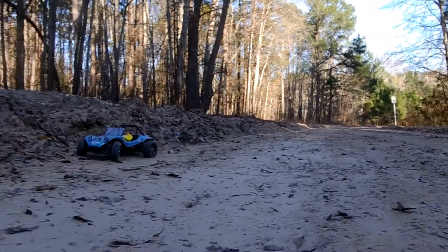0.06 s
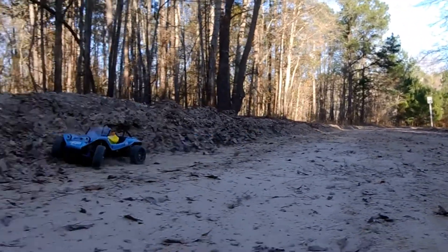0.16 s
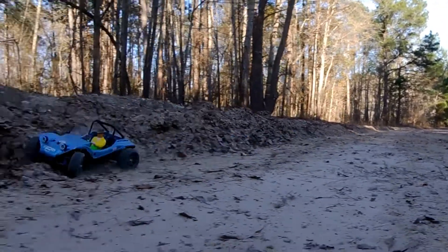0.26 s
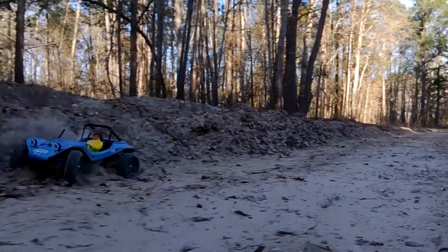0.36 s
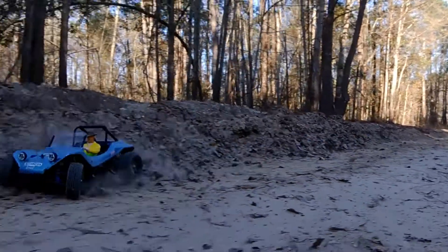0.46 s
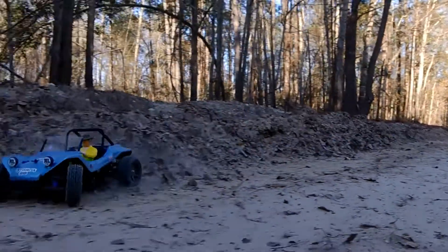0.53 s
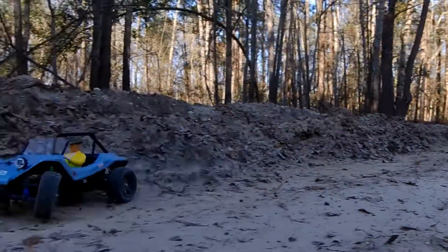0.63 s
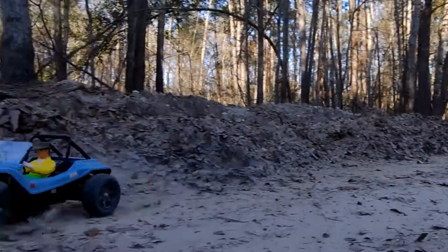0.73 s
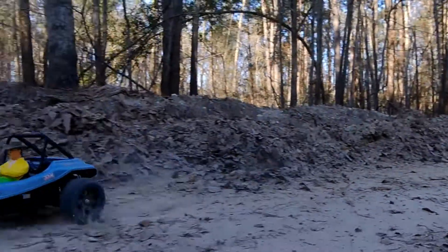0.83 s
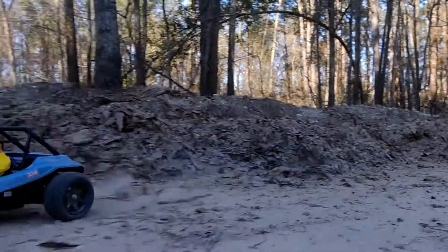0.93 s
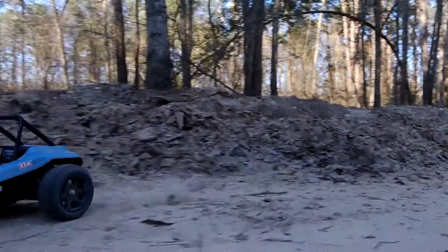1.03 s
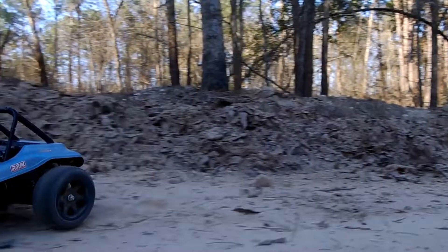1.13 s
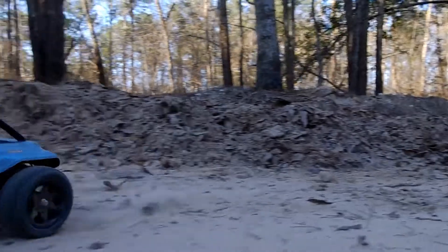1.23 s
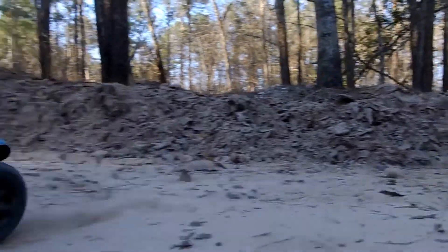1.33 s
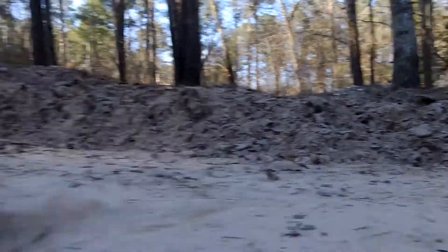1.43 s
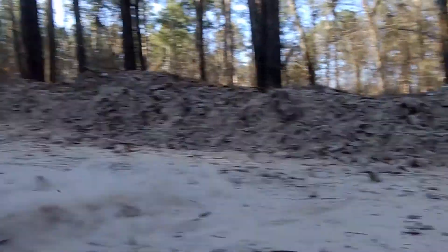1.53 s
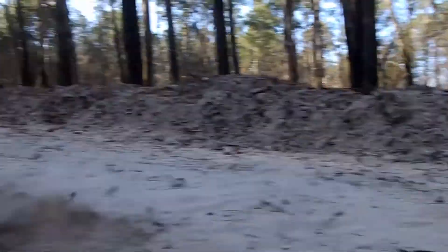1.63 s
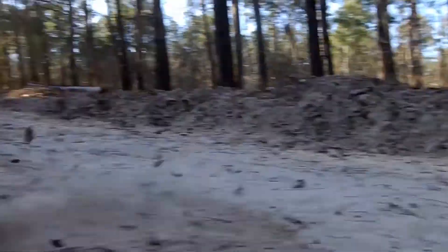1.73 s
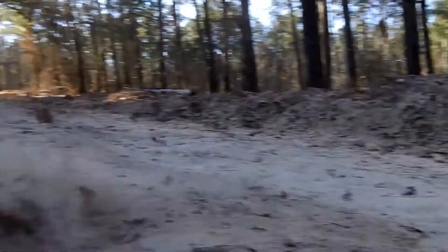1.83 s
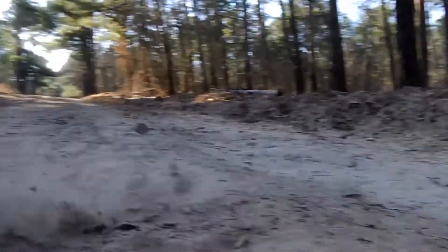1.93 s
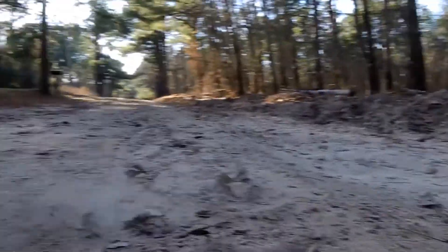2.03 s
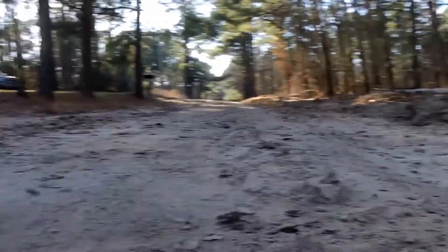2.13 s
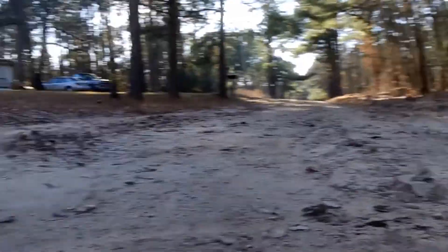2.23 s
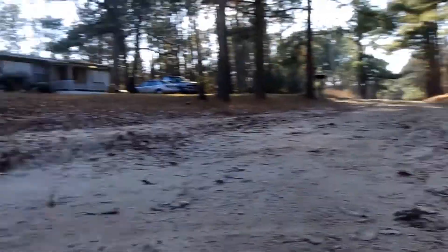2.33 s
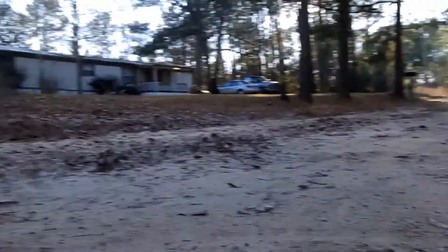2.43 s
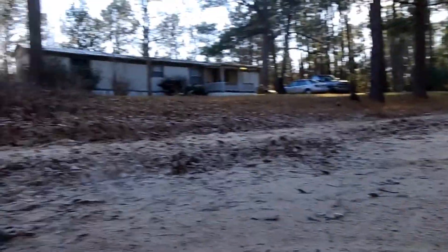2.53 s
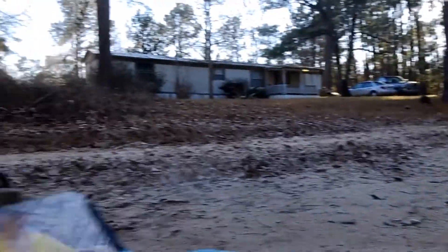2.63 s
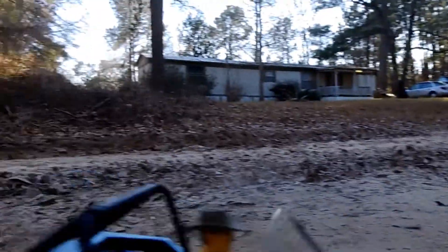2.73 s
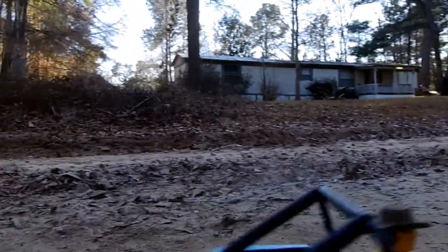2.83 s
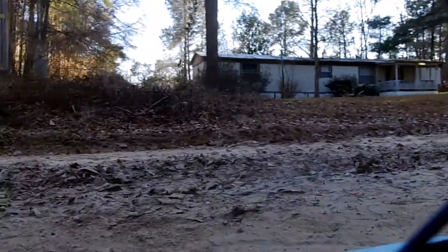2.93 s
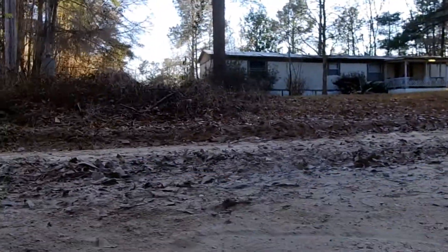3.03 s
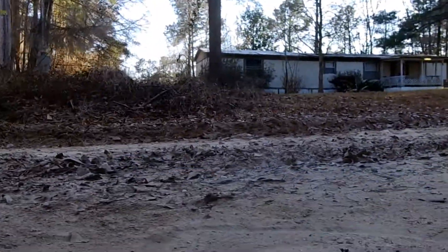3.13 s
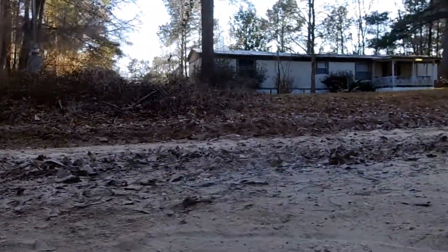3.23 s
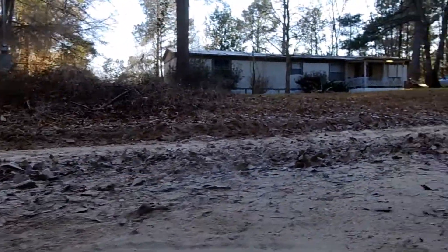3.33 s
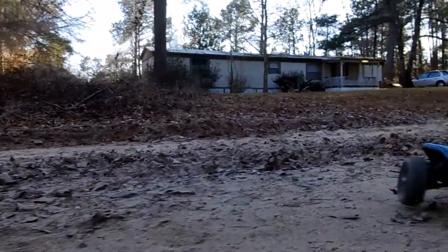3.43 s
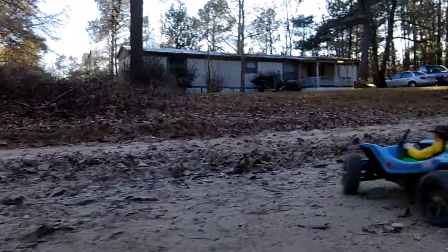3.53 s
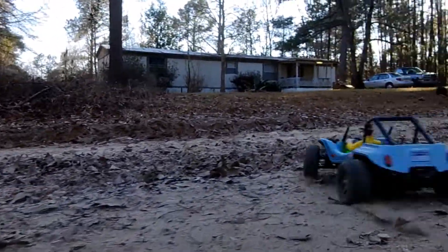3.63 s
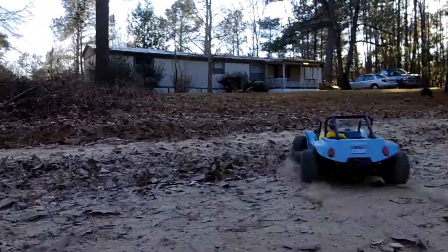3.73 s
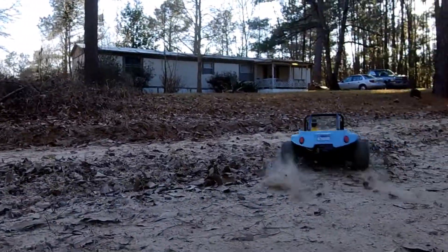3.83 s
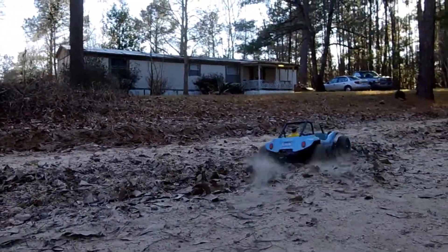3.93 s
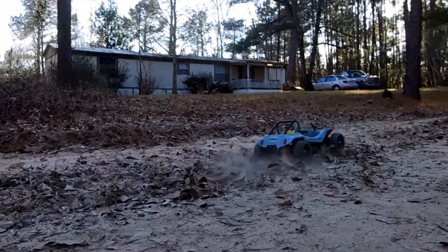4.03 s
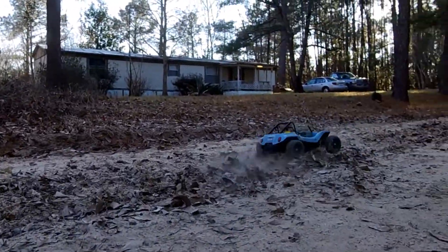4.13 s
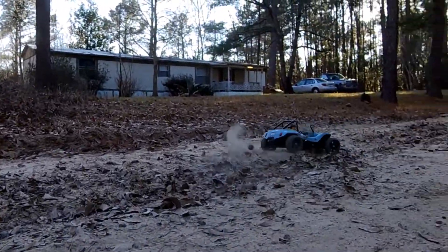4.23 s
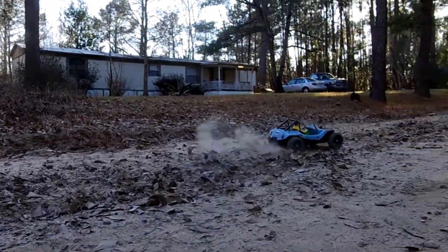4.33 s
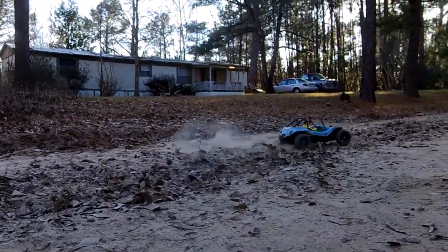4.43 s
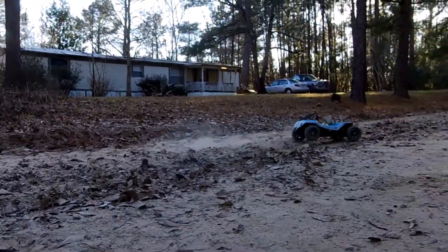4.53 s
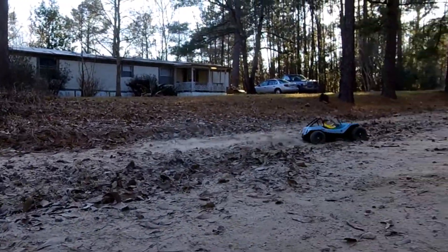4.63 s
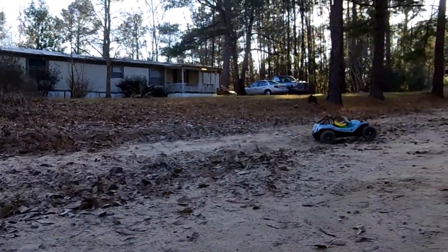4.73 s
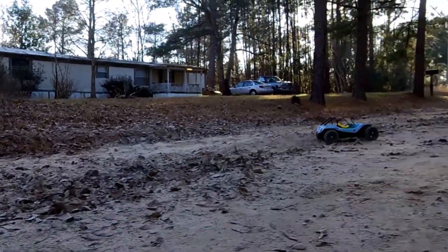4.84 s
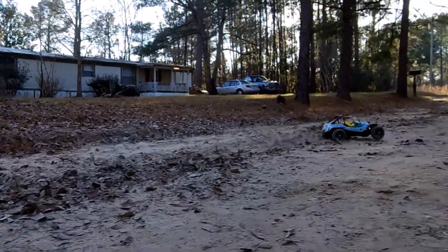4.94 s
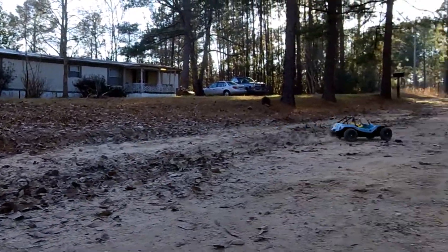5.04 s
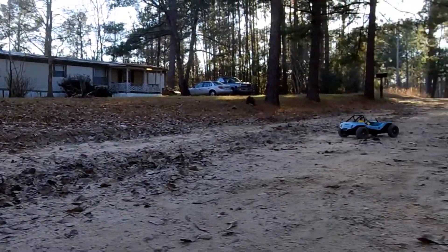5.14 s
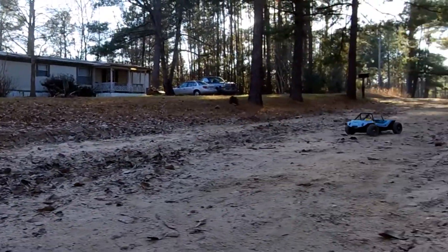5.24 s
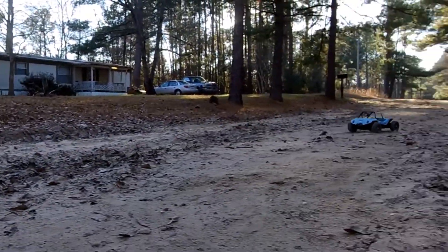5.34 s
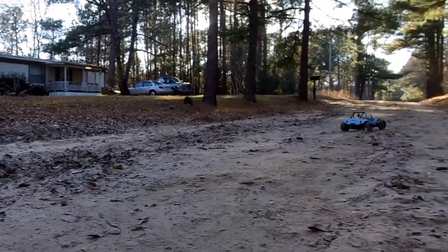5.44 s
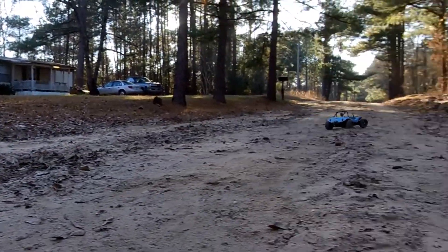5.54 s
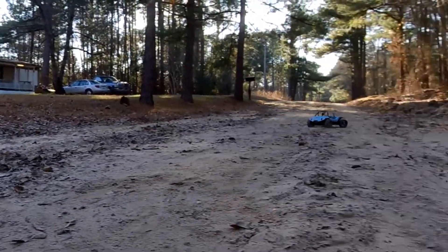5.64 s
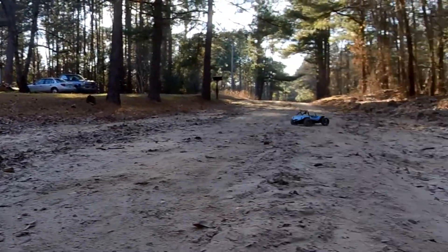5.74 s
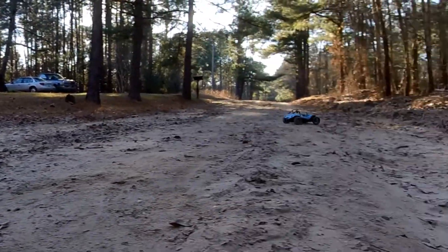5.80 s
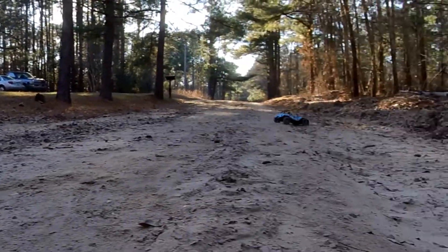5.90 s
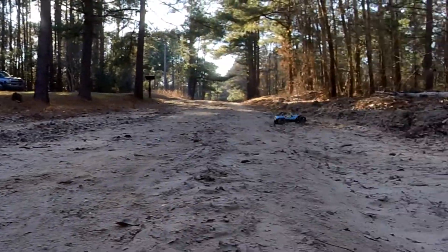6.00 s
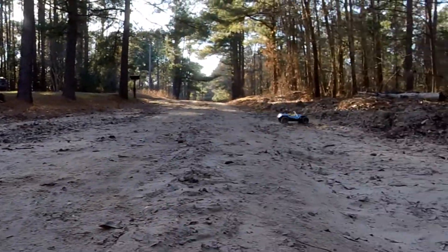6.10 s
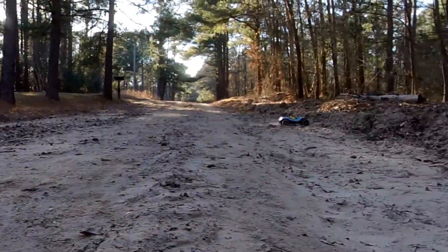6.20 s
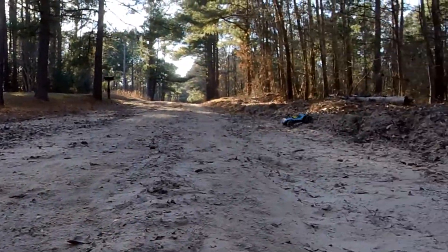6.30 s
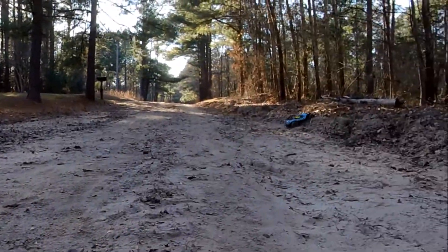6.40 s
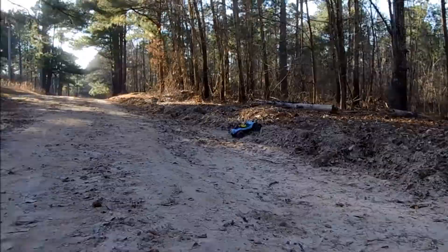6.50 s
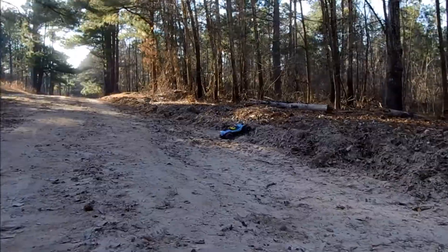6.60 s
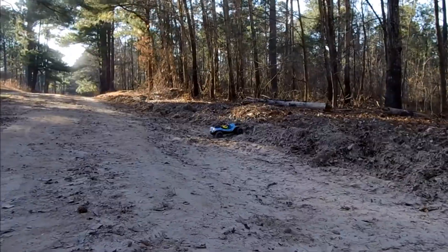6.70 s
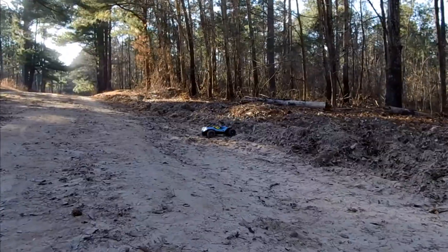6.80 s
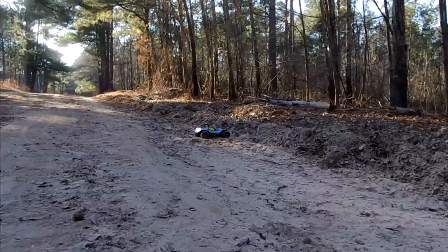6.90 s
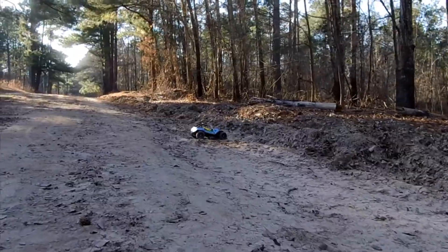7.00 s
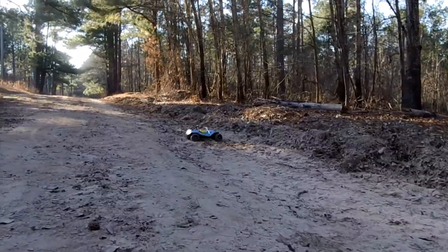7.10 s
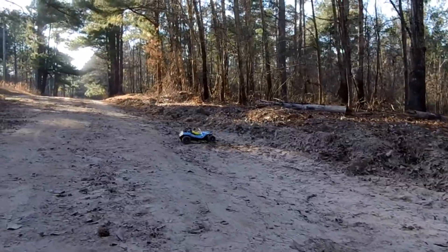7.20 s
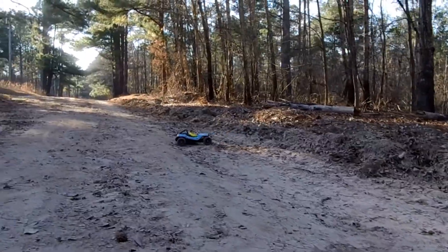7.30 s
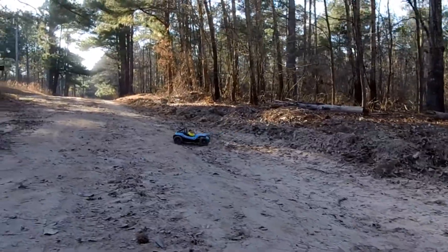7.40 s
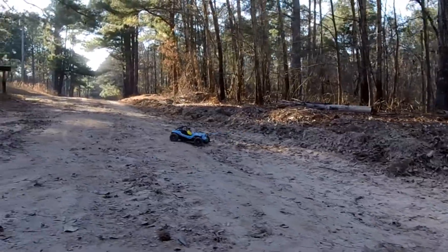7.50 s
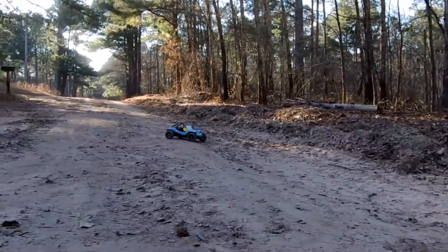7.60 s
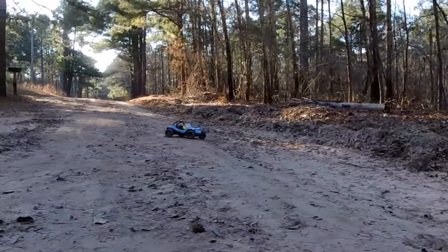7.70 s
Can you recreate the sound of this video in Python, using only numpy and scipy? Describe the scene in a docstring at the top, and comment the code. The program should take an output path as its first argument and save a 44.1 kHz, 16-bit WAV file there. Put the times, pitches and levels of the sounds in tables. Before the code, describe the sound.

Mono, close to the ground on an open dirt road beside woods. From 0 s there is low wind rumble, light plastic rattle and the thin, high whine of a small electric buggy approaching. Around 0.65-0.7 s strong bursts of air buffet the microphone and a loose part clacks; the whine drops and grows rougher as the car passes. More wind thumps come near 1.25-1.5 s, with grit crackling. From about 1.7 to 3.3 s it is loudest: a nasal, rapidly wavering gear whine over hollow chassis clatter, knocks and twig snaps, the rattle peaking near 2.2 s. After 3.5 s it drives away, whine breaking into weaker whirrs and chirps, with small ticks through 6 s. The motor nearly disappears around 6.2-6.7 s, leaving a faint woodland hush and light crackle, then a distant whine returns weakly near 7.2-7.5 s and fades.

```python
"""A low wind rumble and a plastic rattle open the scene, then the gear whine of a small electric buggy on dirt.
The buggy bounces past, turns and drives off. Its whine is tooth-rate harmonics that race and sag; random knocks
ring its chassis, tyre grit is coloured crackle, and wake and breeze are shaped noise buffeting the microphone.
Woods hush far off; twigs snap as short noise bursts, and a loose part clacks as decaying sines."""
import sys
import numpy as np
from scipy import signal
from scipy.fft import rfft, irfft, next_fast_len
from scipy.io import wavfile
from scipy.ndimage import uniform_filter1d

SR = 44100
rng = np.random.default_rng(int(sys.argv[2]) if len(sys.argv) > 2 else 0)


def amplitude_ratio(level_db):
    """Convert a level in decibels to the matching linear amplitude (field) ratio."""
    exponent = np.asarray(level_db, float) / 20
    return 10 ** exponent


def generate_wav(signal):
    """Clip the signal to [-1, 1] and save it as 16-bit WAV at the path in sys.argv[1]."""
    frames = np.transpose(np.atleast_2d(signal))
    scaled = np.clip(frames, -1, 1) * 32767
    pcm = np.round(scaled).astype(np.int16)
    wavfile.write(sys.argv[1], SR, pcm)


N = 342171
T = np.arange(N) / SR

# Chassis resonances: mode_hz, width_hz, relative level_db
CHASSIS_MODES = [(168.06, 110, -11), (364.4, 71, 3.5), (460, 93, 6), (632, 255, 0), (990, 380, -3.5),
                 (1245, 150, -3.5), (1740, 1060, -6), (2400, 1000, -14)]
# Spectrum of thrown grit and leaves: frequency_hz, relative density_db (per Hz)
GRIT_SPECTRUM = [(600, -37), (1500, -22), (3100, -4.5), (5000, 1), (7000, -2), (10000, -3.5), (13000, -7),
                 (16000, -9.5)]
# Resonances of a loose plastic part: mode_hz, relative level_db, t60_s of a single clack
LOOSE_PART_MODES = [(1157, 1.5, 0.052), (2200, -4.5, 0.04)]


def level(x, db):
    """Set the rms level."""
    return x * amplitude_ratio(db) / np.sqrt(np.mean(x ** 2))


def curve(table):
    """Columns of a table joined by straight lines in time."""
    s, *columns = np.transpose(table)
    return [np.interp(T, s, c) for c in columns]


def response_db(table, hz):
    """Read a spectrum on a log-frequency axis."""
    f, db = np.transpose(table)
    return np.interp(np.log(np.maximum(hz, 1)), np.log(f), db)


def colour(x, table):
    """Filter by a spectrum."""
    size = next_fast_len(N)
    hz = np.arange(size // 2 + 1) * SR / size
    return irfft(rfft(x, size) * amplitude_ratio(response_db(table, hz)), size)[:N]


def ring(x, modes):
    """Sum of resonances with alternating sign."""
    out = 0
    for k, (hz, width_hz, db) in enumerate(modes):
        b, a = signal.iirpeak(hz, hz / width_hz, fs=SR)
        out = out + (-1) ** k * amplitude_ratio(db) * signal.lfilter(b, a, x)
    return out


def walk(rate):
    """Random levels held 1 / rate s and slewed twice; spread near 1."""
    k = int(SR / rate)
    held = np.repeat(rng.standard_normal(N // k + 1), k)
    return 1.3 * uniform_filter1d(uniform_filter1d(held, k), k)[:N]


def grains(per_s, spread_db):
    """Random impacts, many small and a few large; a negative spread favours the large ones."""
    chance = rng.random((3, N))
    hits = chance[0] < per_s / SR
    sign = np.sign(chance[1] - .5)
    return hits * sign * amplitude_ratio(-spread_db * np.log(chance[2] + 0.15))


def swell(s, length):
    """A smooth rise and fall around a moment, top 1."""
    return np.exp(-(2 * (T - s) / max(length, .01)) ** 2)


def wind():
    """Gusty rumble that gains a higher flutter as it strengthens, plus single eddies that push and sag back."""
    # steady air over the microphone, raised by the car's wake: time_s, level_db
    steady_air = [(0, -40.5), (.58, -47), (.75, -30), (1.15, -30.5), (1.5, -30.5), (1.8, -48), (3, -46.5),
                  (3.5, -43), (3.85, -50), (6.5, -53.5), (6.8, -46), (7.76, -48.5)]
    # gusts on top: centre_s, level_db, length_s
    gust_swells = [(0.185, -28, 0.039), (0.647, -16.5, 0.027), (0.713, -27.5, 0.026), (1.233, -30.5, 0.17),
                   (1.53, -25, 0.1), (2.187, -47, 0.19), (3.32, -47, 0.087), (5.942, -42, 0.089)]
    # rumble spectrum: frequency_hz, relative density_db (per Hz)
    rumble_spectrum = [(12, -17), (24, 7), (42, 3.5), (75, -2.5), (130, -10.5), (220, -52.5)]
    # eddies hitting the microphone port: centre_s, peak_db before the high-pass, width_s (one sigma)
    eddies = [(1.357, -17, 0.0011), (1.367, -8, 0.00095), (1.383, -12, 0.0033), (1.404, -7.5, 0.00095),
              (0.847, -19.5, 0.0012), (0.876, -21, 0.0023)]
    strong_db = -32  # above this wind level the flutter is lifted, below it is held back
    brighten = .45   # extra flutter, dB per dB of wind

    air = amplitude_ratio(curve(steady_air)[0])
    air = air + sum(amplitude_ratio(db) * swell(s, length) for s, db, length in gust_swells)
    wind_db = 20 * np.log10(air)
    rumble = level(colour(rng.standard_normal(N), rumble_spectrum) * amplitude_ratio(1.5 * walk(22)), -5.0)
    flutter = level(ring(rng.standard_normal(N), [(108, 52, 0)]) * amplitude_ratio(9.3 * walk(30)), -12.5)
    flutter = signal.sosfilt(signal.butter(2, 260, fs=SR, output="sos"), flutter)
    gusts = amplitude_ratio(wind_db) * (rumble + amplitude_ratio(brighten * (wind_db - strong_db)) * flutter)
    push = sum(amplitude_ratio(db) * np.exp(-.5 * ((T - s) / width) ** 2) for s, db, width in eddies)
    b, a = signal.butter(1, 30, "high", fs=SR)  # makes each push sag back
    return gusts + signal.lfilter(b, a, push)


def rolling():
    """Stones knock each chassis mode on its own over a scrub of tyres; grit and leaves crackle in bursts."""
    # the car coming, passing, turning and leaving: time_s, rattle_db, grit_db
    drive = [(0, -47, -55), (.4, -44, -47.5), (.68, -40.5, -51), (.95, -43, -57.5), (1.3, -39.5, -56.5),
             (1.6, -39, -49.5), (1.85, -36.5, -48.5), (2.24, -31.5, -56), (2.46, -35, -72),
             (2.88, -41.5, -49.5), (3.1, -35.5, -49), (3.35, -42.5, -47.5), (3.6, -43, -52.5),
             (3.95, -46.5, -52.5), (4.35, -50, -56), (4.6, -52.5, -62.5), (4.9, -51, -60.5),
             (5.3, -54.5, -67.5), (5.6, -59.5, -63.5), (6.04, -55, -67.5), (6.14, -66.5, -66.5),
             (6.75, -63.5, -64), (7.18, -61.5, -68.5), (7.54, -60, -72), (7.76, -71, -73)]
    # jolts over ruts and leaf piles, added on top: centre_s, rattle_db, grit_db, length_s
    jolts = [(0.452, -46, -63, 0.048), (0.87, -49, -50, 0.026), (1.18, -39, -71, 0.071),
             (1.337, -59, -53, 0.08), (1.589, -47, -42, 0.11), (1.706, -33.5, -48, 0.042),
             (2.852, -40.5, -75, 0.41), (3.336, -39.5, -53, 0.018), (6.419, -74, -61.5, 0.042),
             (7.511, -52, -92.5, 0.057), (7.75, -58.5, -93, 0.067)]

    rattle_db, grit_db = curve(drive)
    rattle_gain = amplitude_ratio(rattle_db) + sum(amplitude_ratio(db) * swell(s, length) for s, db, _, length in jolts)
    grit_gain = amplitude_ratio(grit_db) + sum(amplitude_ratio(db) * swell(s, length) for s, _, db, length in jolts)

    modes = 0
    for mode in CHASSIS_MODES:
        stones = level(grains(per_s=180., spread_db=3.0), -3.5)
        scrub = level(rng.standard_normal(N), -4.5)
        modes = modes + ring((stones + scrub) * amplitude_ratio(3.15 * walk(30)), [mode])
    rattle = level(modes * amplitude_ratio(1.06 * walk(30.01)), 0)

    spray = level(grains(per_s=4400.0, spread_db=15.0), -0.87) + level(rng.standard_normal(N), -1.5)
    grit = level(colour(spray, GRIT_SPECTRUM) * amplitude_ratio(3.25 * walk(35)), 0.077)

    # the loose part chatters along, its modes damped harder than in a single clack
    damped_modes = [(hz, 9 / t60, db) for hz, db, t60 in LOOSE_PART_MODES]
    chatter = level(ring(grains(per_s=45., spread_db=-8.5), damped_modes), -18.0)
    return rattle_gain * (rattle + chatter) + grit_gain * grit


def gears():
    """Tooth-rate harmonics through the gearbox, throbbing once a pinion turn, with a rasp of worn teeth."""
    # gears race as wheels skip, sag as they bite, sing louder under load:
    # time_s, tooth_rate_hz, whine_db before load and lost contact
    mesh = [(0, 2615, -66), (0.08, 2610, -54.5), (0.165, 2470, -62), (0.19, 2637, -51), (0.42, 2080, -62),
            (0.5, 2640, -66), (0.531, 2770, -49), (0.546, 2400, -45), (0.573, 2730, -43),
            (0.588, 2440, -48.5), (0.609, 2630, -51), (0.63, 2144, -46), (0.655, 2646, -47.5),
            (0.671, 2400, -45.5), (0.69, 2283, -51), (0.704, 1890, -35), (0.726, 1934, -43),
            (0.746, 2156, -43), (0.78, 2420, -47), (0.81, 2250, -46.5), (0.85, 2920, -52.5),
            (0.866, 2640, -45.5), (0.912, 1960, -41.5), (0.948, 1847, -43), (0.96, 2086, -38.5),
            (0.976, 1906, -40), (0.988, 2122, -36), (1.002, 1899, -49), (1.018, 2033, -36),
            (1.032, 1872, -43), (1.047, 1918, -43), (1.064, 1840, -35.5), (1.086, 2147, -43),
            (1.101, 2055, -39.5), (1.125, 2114, -39.5), (1.141, 1918, -38.5), (1.161, 2107, -41.5),
            (1.213, 2150, -39), (1.239, 1667, -35.5), (1.283, 2142, -39), (1.317, 2237, -42),
            (1.343, 1866, -34), (1.417, 2414, -45.5), (1.449, 2415, -39), (1.471, 1910, -33.5),
            (1.501, 1670, -39), (1.535, 2140, -40), (1.57, 2088, -34), (1.584, 1720, -37.5),
            (1.596, 1720, -44), (1.612, 2040, -37), (1.65, 2210, -42.5), (1.68, 2200, -57.5),
            (1.7, 2200, -29.5), (1.714, 2150, -36), (1.726, 1852, -38.5), (1.744, 2200, -34.5),
            (1.782, 2210, -33), (1.798, 1856, -33), (1.82, 1804, -29.5), (1.85, 2160, -36.5),
            (1.92, 1933, -33.5), (1.956, 2146, -35.5), (1.974, 1864, -33), (2.039, 2120, -37.5),
            (2.071, 1790, -31.5), (2.127, 2050, -35.5), (2.193, 1762, -37), (2.251, 1942, -33),
            (2.377, 1407, -40.5), (2.426, 1666, -39.5), (2.46, 1530, -42), (2.49, 1736, -36.5),
            (2.534, 1679, -41.5), (2.56, 1806, -31.5), (2.632, 1552, -40), (2.674, 1800, -32.5),
            (2.7, 1690, -35), (2.72, 1905, -36), (2.772, 1706, -38), (2.814, 2024, -31.5),
            (2.842, 1706, -34.5), (2.893, 1874, -29.5), (2.955, 1928, -39.5), (2.991, 1676, -30),
            (3.035, 2152, -44.5), (3.047, 1775, -32), (3.081, 1730, -40), (3.099, 2166, -41),
            (3.127, 2254, -41.5), (3.145, 1766, -33.5), (3.169, 1540, -43), (3.195, 2067, -40),
            (3.221, 2167, -37), (3.265, 1532, -38.5), (3.293, 2090, -53), (3.322, 2330, -37),
            (3.35, 1658, -43.5), (3.394, 2075, -41.5), (3.432, 1604, -45), (3.476, 1640, -45),
            (3.498, 2155, -42.5), (3.544, 1986, -42), (3.562, 1680, -41), (3.578, 1938, -43.5),
            (3.614, 2115, -45), (3.656, 1730, -44.5), (3.676, 1905, -42.5), (3.688, 1740, -45),
            (3.714, 1790, -43.5), (3.753, 2240, -43), (3.769, 1863, -41), (3.801, 1690, -45),
            (3.851, 2250, -48.5), (3.9, 2360, -51), (3.915, 2620, -48.5), (3.955, 1800, -47),
            (3.978, 2216, -52.5), (4.033, 1770, -50.5), (4.057, 1750, -44.5), (4.077, 2115, -51),
            (4.11, 2374, -59), (4.165, 1740, -45), (4.19, 2210, -57), (4.21, 1776, -44.5),
            (4.258, 2324, -50), (4.296, 2300, -56.5), (4.348, 1950, -54.5), (4.362, 1650, -47),
            (4.45, 2080, -58.5), (4.482, 1783, -51.5), (4.496, 1555, -55), (4.52, 1860, -57),
            (4.538, 2070, -47), (4.555, 1827, -54), (4.575, 1794, -81), (4.592, 1835, -51),
            (4.605, 1580, -58), (4.644, 1876, -49), (4.662, 1515, -56), (4.69, 1470, -48),
            (4.705, 1458, -69), (4.716, 1595, -50), (4.731, 1670, -51), (4.743, 2200, -56),
            (4.77, 2410, -51), (4.8, 2047, -58.5), (4.822, 1950, -77), (4.834, 1680, -49),
            (4.862, 2010, -54), (4.888, 1970, -50), (4.908, 1584, -57), (4.924, 2010, -60),
            (4.942, 1986, -44), (4.96, 2376, -56.5), (4.976, 2330, -62), (5.008, 1697, -47.5),
            (5.03, 1890, -49), (5.055, 2430, -55), (5.072, 1950, -54.5), (5.112, 1763, -55),
            (5.132, 2065, -59.5), (5.166, 1960, -60), (5.18, 1777, -50), (5.196, 1910, -52),
            (5.224, 1894, -57), (5.236, 1770, -62), (5.258, 1870, -43), (5.286, 2036, -61.5),
            (5.298, 1930, -48.5), (5.345, 2260, -70.5), (5.374, 1960, -51), (5.432, 2545, -56),
            (5.46, 1980, -59), (5.563, 1986, -60.5), (5.618, 2620, -55), (5.634, 2320, -61),
            (5.66, 2076, -64), (5.735, 2490, -60), (5.752, 2340, -64), (5.77, 2600, -63),
            (5.792, 2117, -57), (5.84, 2370, -67), (5.87, 2490, -55), (5.9, 2200, -72), (5.915, 2580, -60),
            (5.94, 2180, -58), (5.978, 2625, -57), (5.995, 2360, -59), (6.032, 2600, -55),
            (6.05, 2350, -74), (6.2, 2300, -101), (6.75, 2030, -77), (6.94, 1770, -66), (7.0, 1845, -64),
            (7.05, 1896, -67), (7.2, 1910, -66), (7.235, 2000, -60), (7.29, 1964, -55.5), (7.31, 1875, -79),
            (7.41, 2000, -57.5), (7.48, 2126, -60), (7.55, 2166, -66), (7.76, 2060, -83)]
    # how much of the lowest tone faces the microphone as the car turns: time_s, relative level_db
    facing = [(0, 11), (.8, 2.5), (2.2, 2.5), (2.5, -1.5), (3.2, -0.5), (3.8, 4), (4.2, -17), (4.8, 7),
              (5.4, -5), (6, 11), (6.8, 23), (7.76, 8)]
    # gearbox response: frequency_hz, relative gain_db
    gearbox = [(1300, -8), (1900, -4.5), (2200, -9), (2700, -14.5), (3400, -18.5), (4200, -7), (4700, -1.5),
               (5400, 2.5), (6200, -8), (7000, -19.5), (8000, -19.5), (9200, -34), (10700, -22.5),
               (12000, -38), (15000, -68)]
    pinion_teeth = 19
    load_lag_s, load_db = .00087, .28  # delay of the drag; dB per unit of drag
    judder, ruts = .014, .00028        # speed shake as a fraction; more per dB of faintness
    turn_db, flicker_db = 3, 3         # throb per pinion turn; random flicker of each harmonic
    stumble = .55                      # random phase, radians at the first harmonic
    slack, coast = .17, .003           # lost contact at random; while the wheels spin up

    hz, whine_db = curve(mesh)
    hz = uniform_filter1d(hz, int(0.0015 * SR))  # inertia rounds the speed changes

    # teeth press hardest while biting wheels drag the speed down, and run light while they spin up
    log_hz = uniform_filter1d(np.log(hz), int(0.0022 * SR))
    drag = np.clip(-np.gradient(log_hz) * SR, -20, 9)  # fractional slowing per second
    drag = np.interp(T - load_lag_s, T, drag)
    faint = np.clip(-29.5 - whine_db, 4, 35)  # dB

    # small ruts shake the speed, more so where the car runs light and faint
    hz = hz * (1 + judder * (walk(80) + walk(200)) + ruts * faint * walk(85))
    teeth = 2 * np.pi * np.cumsum(hz) / SR  # phase of the tooth rate

    gains = [amplitude_ratio(response_db(gearbox, k * hz) + (curve(facing)[0] if k == 1 else 0)) for k in range(1, 8)]
    total = np.sqrt(sum(g ** 2 for g in gains))
    tones = 0
    # tooth errors make each harmonic stumble in level and phase
    for k, gain in enumerate(gains, 1):
        throb = amplitude_ratio(flicker_db * walk(90) + turn_db * np.sin(teeth / pinion_teeth + k))
        phase = k * teeth + np.sqrt(k) * stumble * walk(400)
        tones = tones + gain / total * throb * np.sqrt(2) * np.sin(phase)

    rasp = level(colour(rng.standard_normal(N), gearbox), -13)
    rasp = rasp * uniform_filter1d(amplitude_ratio(whine_db), int(.1 * SR))

    # the lighter the load, the more the teeth lose contact, at random and while the wheels spin up
    random_loss_db = slack * faint * np.maximum(walk(110), 0)
    spin_up_loss_db = np.clip(-coast * faint ** 2 * drag, 0, 10)
    return amplitude_ratio(whine_db + load_db * drag - random_loss_db - spin_up_loss_db) * tones + rasp


def woods():
    """Far hush of the trees: coloured noise that drifts slowly in level."""
    # hush spectrum: frequency_hz, relative density_db (per Hz)
    hush_spectrum = [(120, 2.5), (200, 2.5), (327, -10.5), (1300, -9), (1980, -30), (8980, -42),
                     (15500, -46)]
    return level(colour(rng.standard_normal(N), hush_spectrum) * amplitude_ratio(1.0 * walk(3.0)), -62.5)


def snaps():
    """Pebbles and twigs snap: a crunch of grit with a duller knock that rings the chassis."""
    # start_s, crunch_db, knock_db (before each burst's rise and decay)
    snap_times = [(0.285, -37, -39.5), (0.6, -38, -30.5), (0.769, -35.5, -33.5), (1.411, -31.5, -30),
                  (1.6645, -32, -50), (1.8498, -33, -33), (2.057, -53, -30.5), (2.118, -51, -27.5),
                  (2.241, -38, -34), (3.0589, -48, -25), (3.1116, -32, -33), (3.608, -35, -43),
                  (3.913, -38, -40), (4.5376, -53, -40.5), (4.834, -46, -41.5), (4.9928, -47, -41.5),
                  (5.437, -52, -46.5), (5.6197, -51, -48.5), (5.832, -48.5, -49), (5.978, -54, -62),
                  (6.026, -58, -45.5), (6.204, -62, -47), (6.278, -55, -48), (6.66, -42, -76),
                  (6.8, -63, -57), (7.012, -57, -62), (7.045, -57, -50.5), (7.465, -52, -58)]
    bright_s, dull_s, rise_s = .006, .014, .002  # decay constants and linear rise

    bright, dull = np.zeros(N), np.zeros(N)
    for s, crunch_db, knock_db in snap_times:
        after = np.maximum(T - s, 0)
        rise = np.minimum(after / rise_s, 1)
        bright += amplitude_ratio(crunch_db) * np.exp(-after / bright_s) * rise
        dull += amplitude_ratio(knock_db) * np.exp(-after / dull_s) * rise
    crunch = level(colour(rng.standard_normal(N), GRIT_SPECTRUM), -0.054)
    knocks = grains(per_s=1400.0, spread_db=5.0)
    knock_gain = amplitude_ratio(-0.5) / np.std(ring(knocks, CHASSIS_MODES))
    return bright * crunch + ring(dull * knocks, CHASSIS_MODES) * knock_gain


def clacks():
    """Each hard bump strikes the loose part once and its modes ring briefly, slightly detuned."""
    # start_s, strike_db (added to the level of each mode)
    strikes = [(0.707, -26.5), (5.6257, -44), (5.8314, -45), (5.9444, -48), (5.9807, -47), (6.302, -52)]
    out = 0
    for (s, db), detune in zip(strikes, rng.standard_normal(len(strikes))):
        after = np.maximum(T - s, 0)
        for hz, mode_db, t60 in LOOSE_PART_MODES:
            tone = np.sin(2 * np.pi * hz * (1 + 0.066 * detune) * after)
            out = out + amplitude_ratio(db) * amplitude_ratio(mode_db - 60 * after / t60) * tone
    return out


def scene():
    """The car, wind and woods, as one channel."""
    return (wind() + rolling() + gears() + woods() + snaps() + clacks())[None]


def low_pass(x):
    """Removes everything above the highest recorded frequency."""
    return signal.sosfilt(signal.butter(12, 15710, fs=SR, output="sos"), x)


def record(dry):
    """Delivers the finished mix."""
    return low_pass(dry)


dry = scene()
out = record(dry)
generate_wav(out)
```